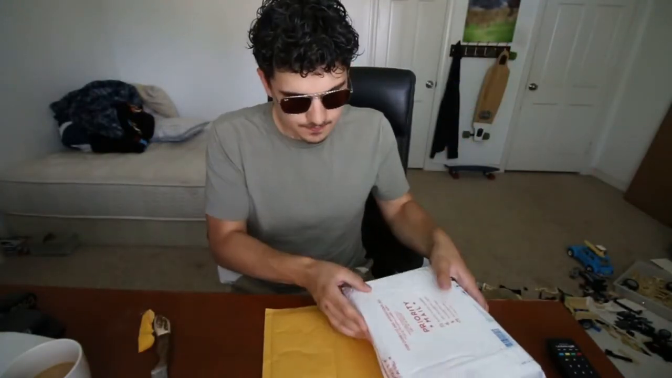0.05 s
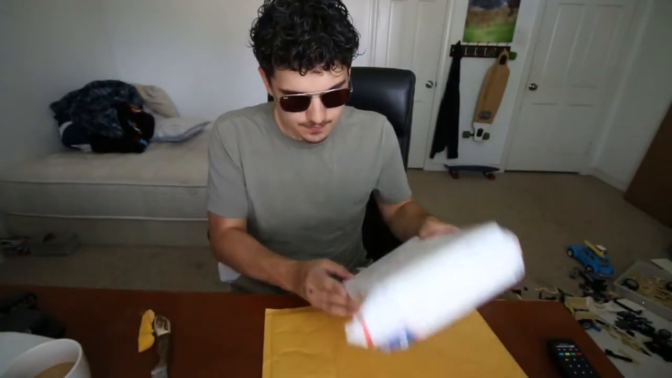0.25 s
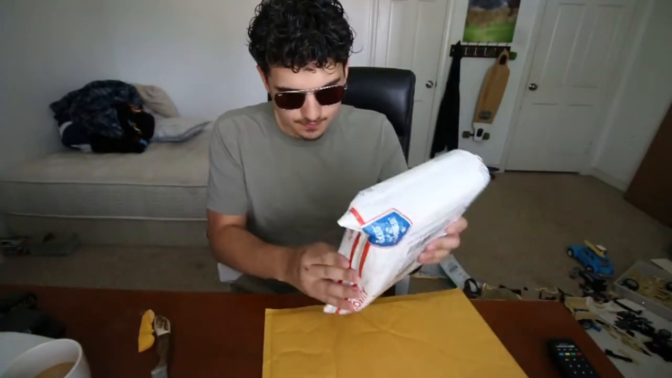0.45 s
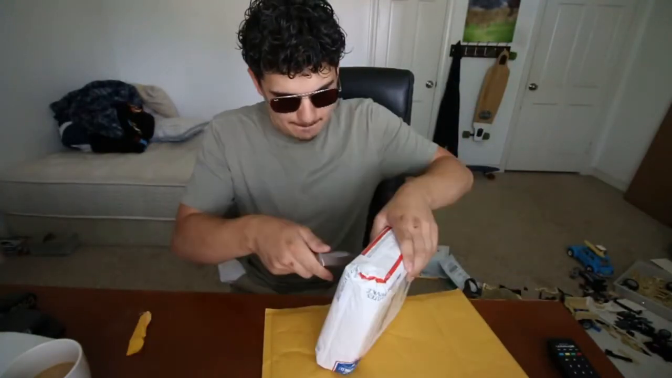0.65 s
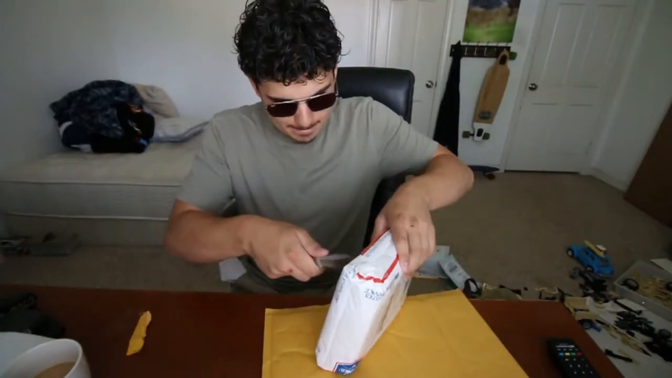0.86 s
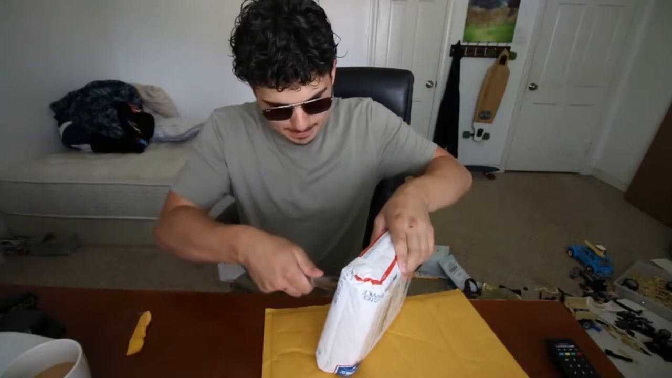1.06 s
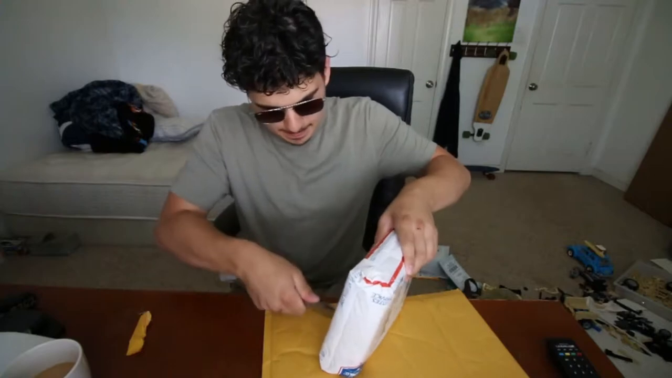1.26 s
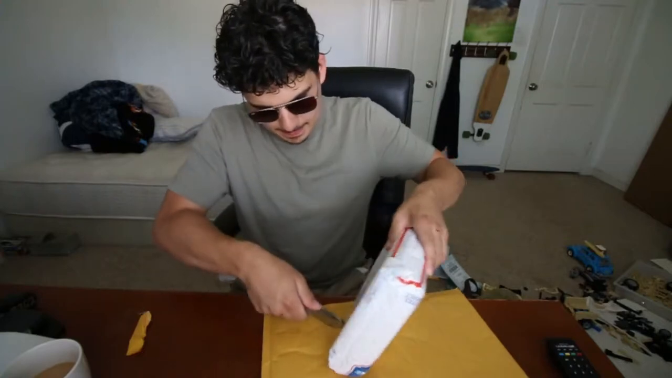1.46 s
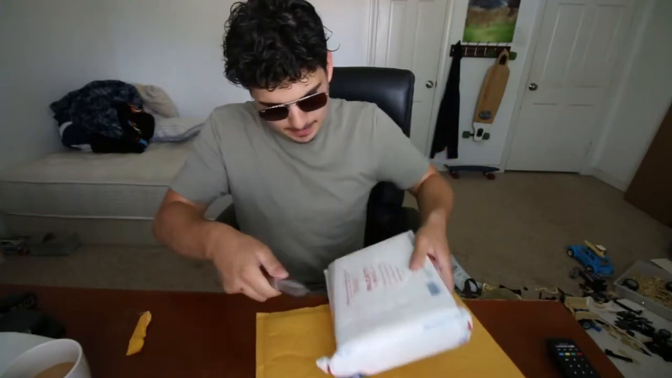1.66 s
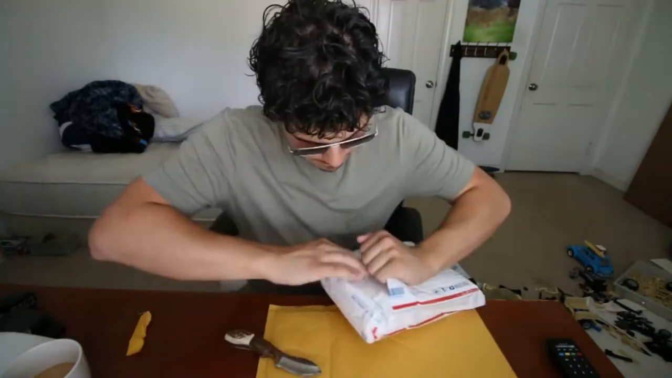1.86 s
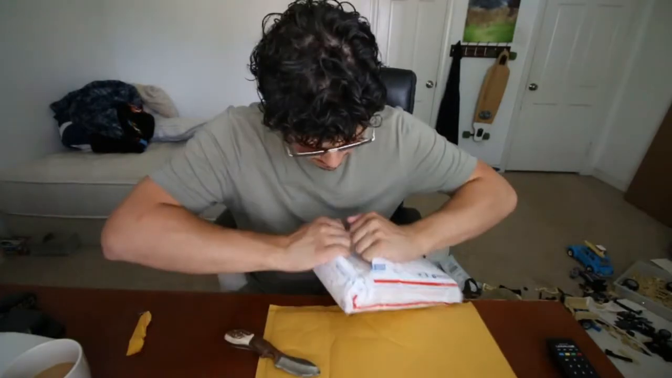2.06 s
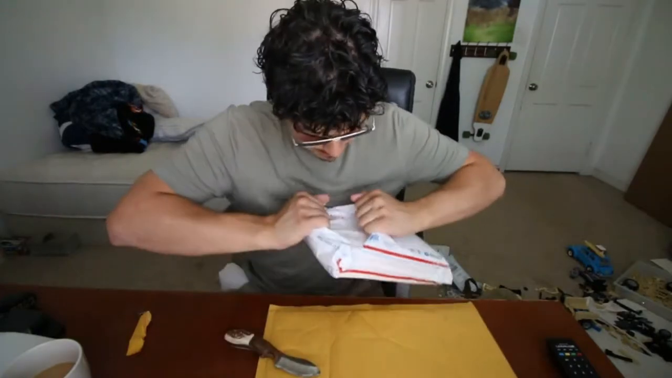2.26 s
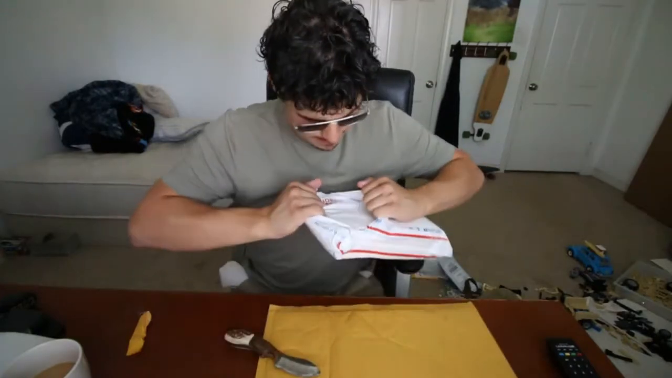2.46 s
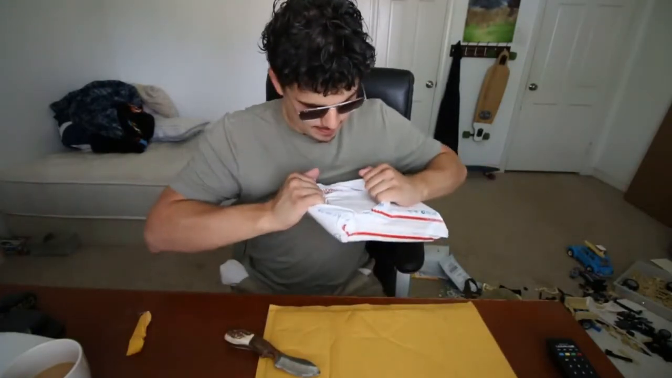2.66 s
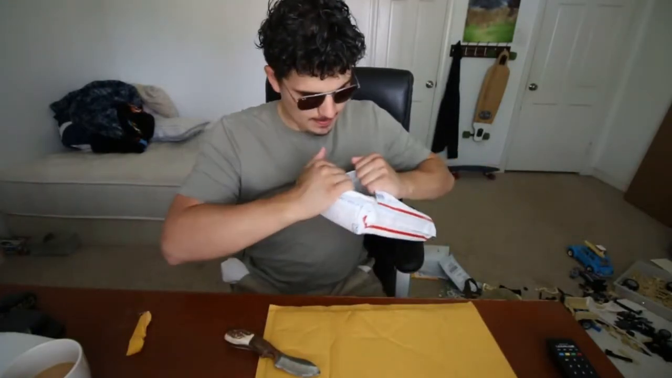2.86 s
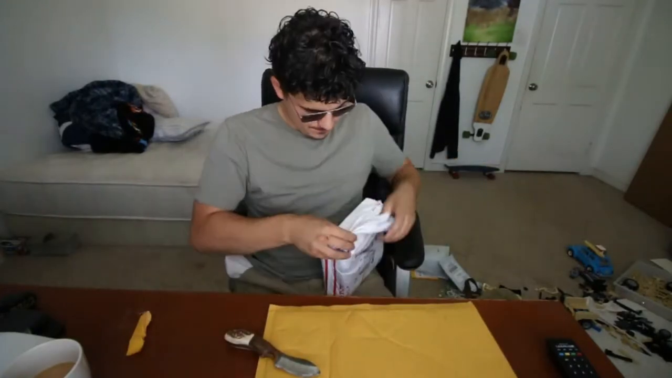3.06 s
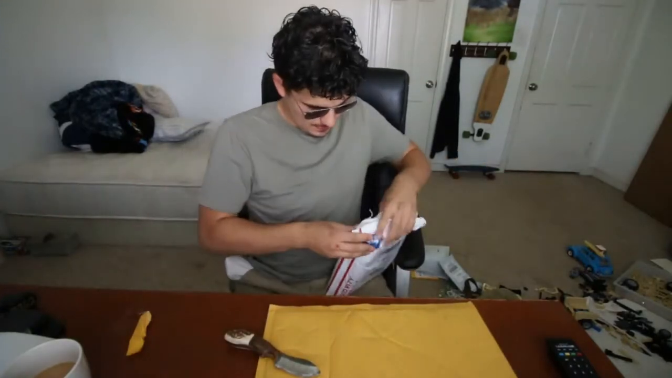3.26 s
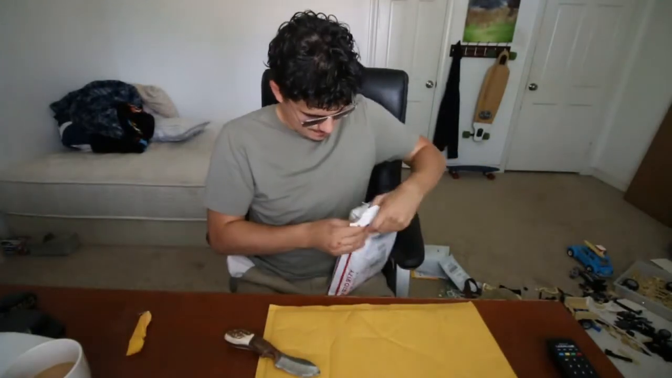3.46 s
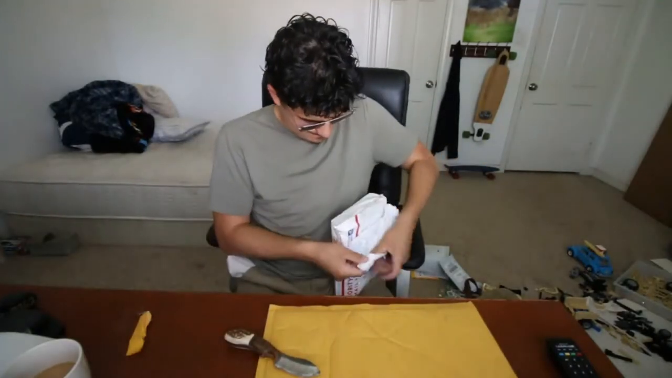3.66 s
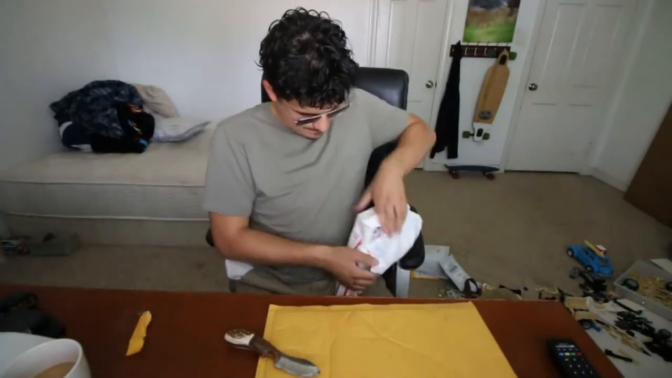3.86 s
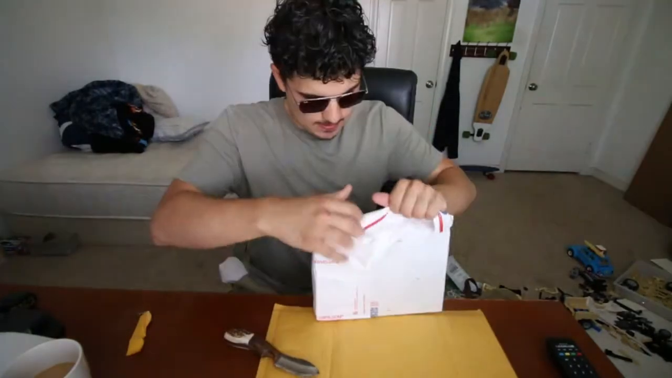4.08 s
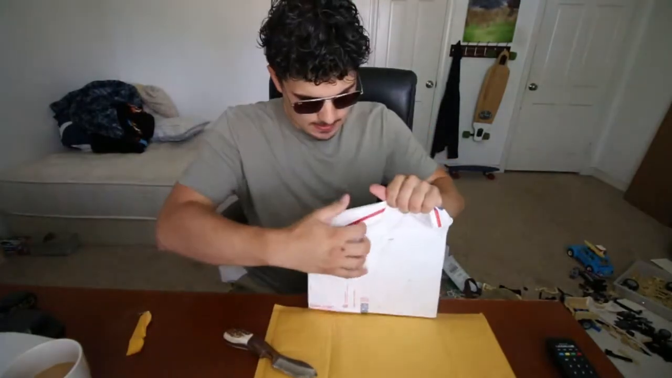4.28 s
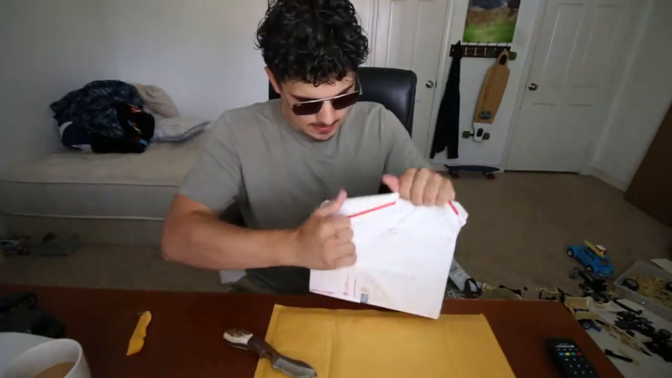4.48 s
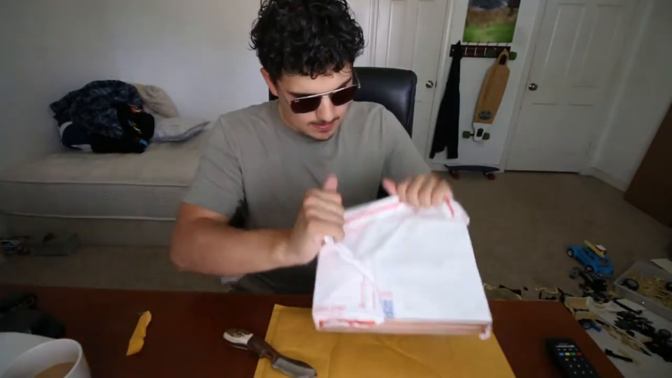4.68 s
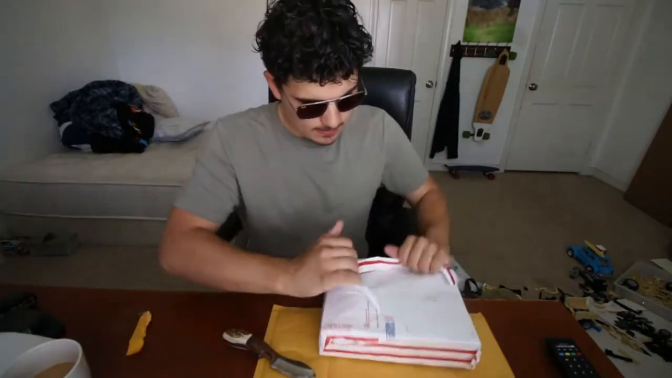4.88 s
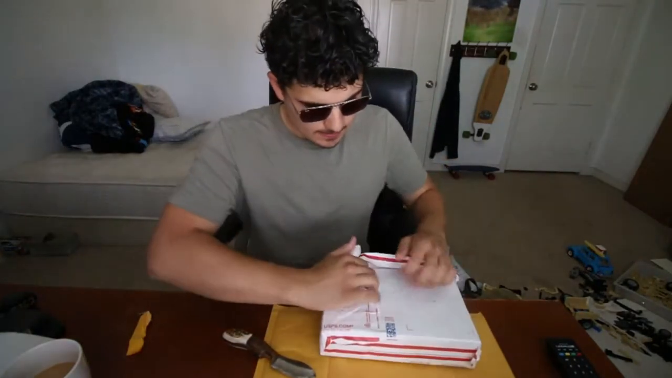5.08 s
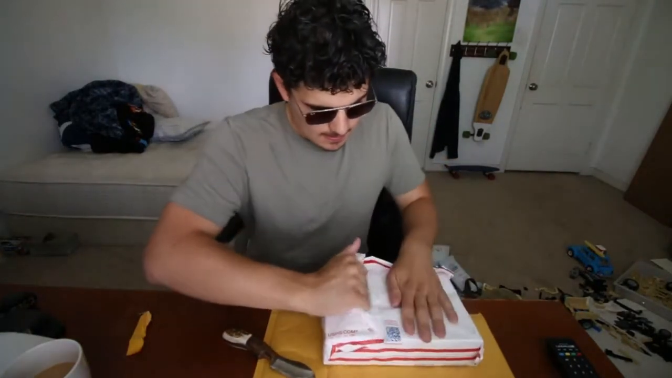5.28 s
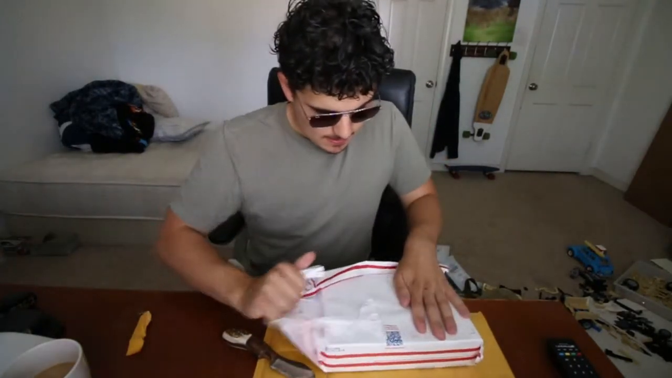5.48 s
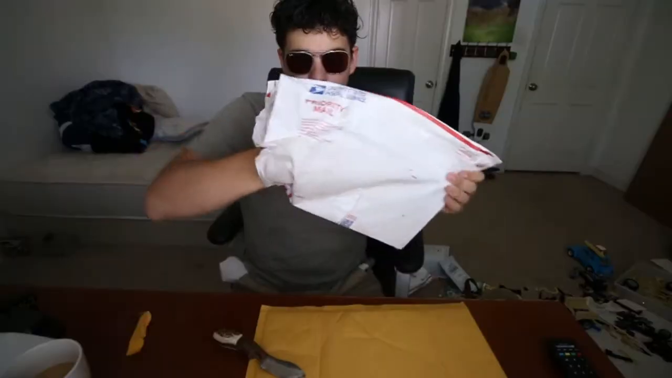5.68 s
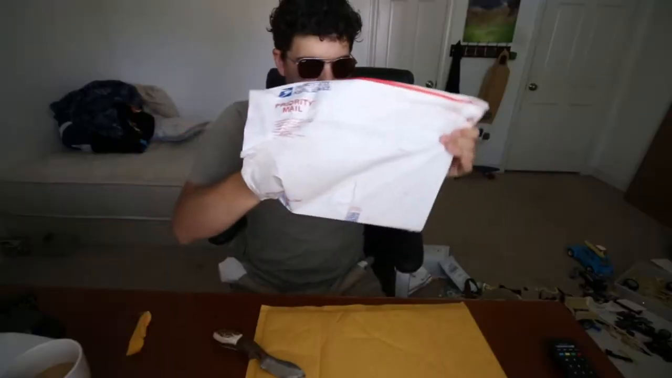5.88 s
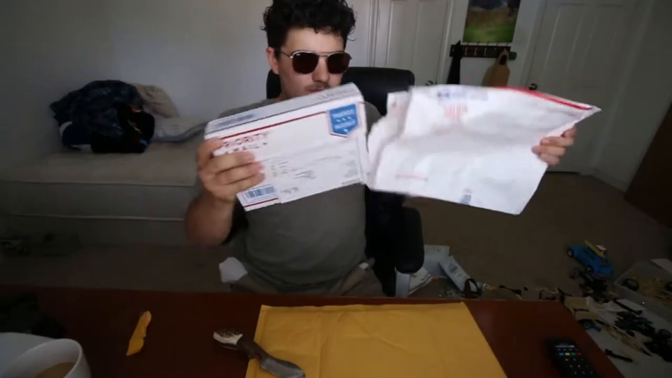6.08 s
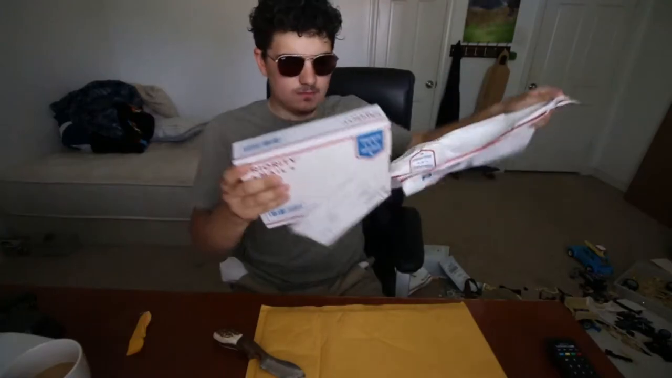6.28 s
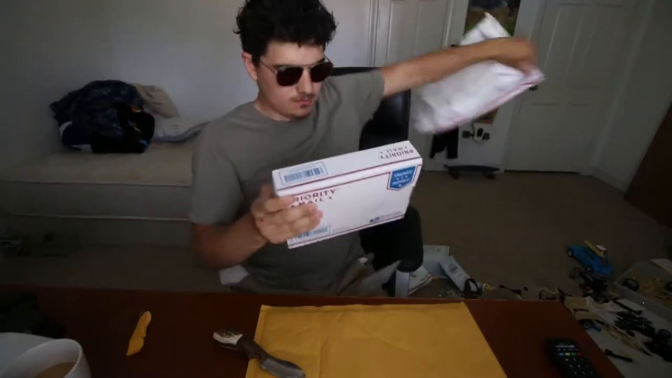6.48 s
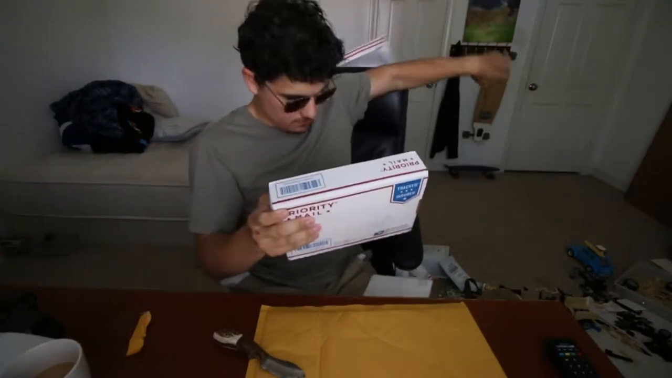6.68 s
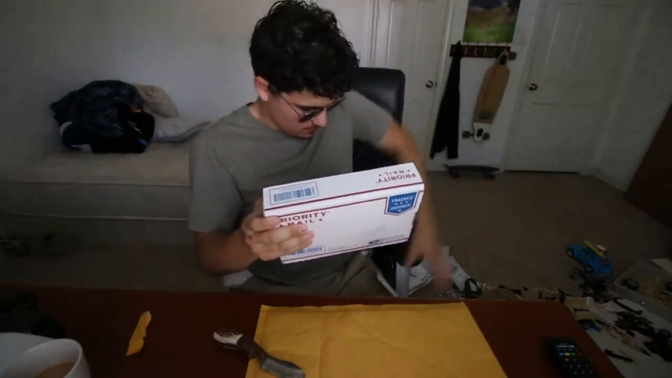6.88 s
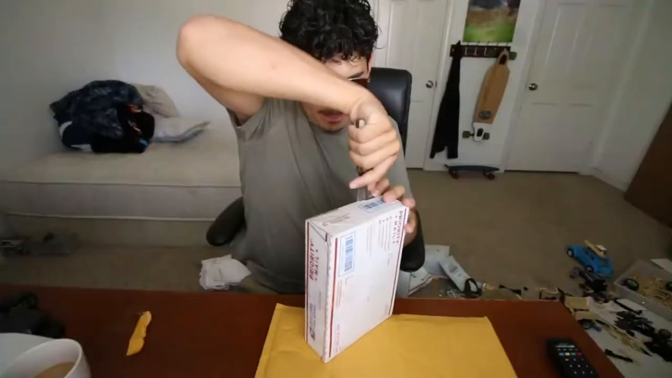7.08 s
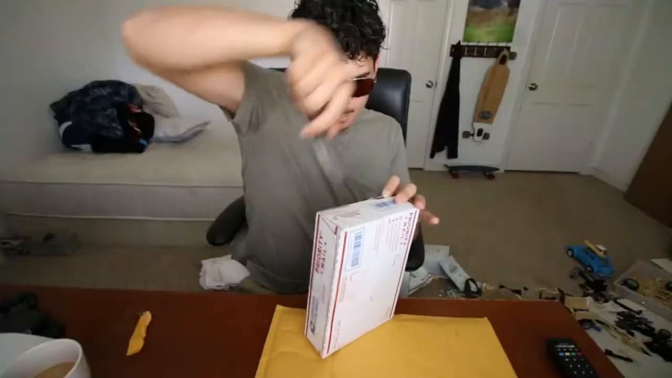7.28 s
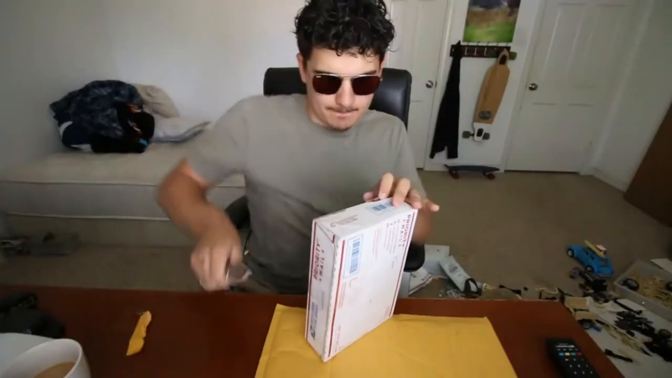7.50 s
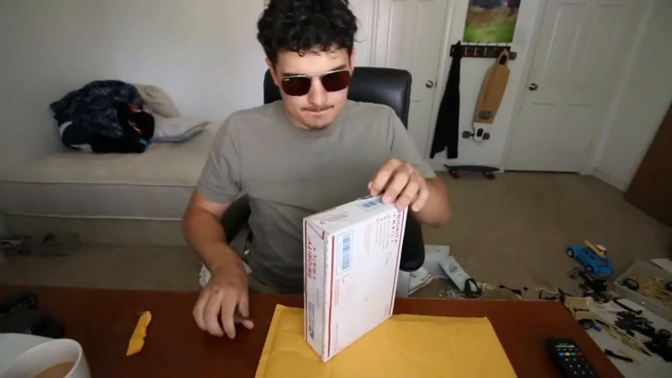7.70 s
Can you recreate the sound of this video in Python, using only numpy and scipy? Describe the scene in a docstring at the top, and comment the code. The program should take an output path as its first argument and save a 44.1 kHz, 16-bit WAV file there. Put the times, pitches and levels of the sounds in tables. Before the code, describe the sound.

Close, dry indoor handling noise: brief envelope crackles, quiet rubbing with a blade, a sharp snap and hollow knock, more fidgety crinkling, then strong tearing and crumpling of stiff wrapping. The bare box comes out with a last big crackle; it gets quiet, with soft scrapes and short dull taps on cardboard, and finally a hard knife drop on wood. Low desk bumps and faint room hiss lie beneath.

```python
"""A stiff mailing envelope around a cardboard box is turned, pulled and torn open at a wooden desk.
Its creases crinkle as clumps of tiny ringing clicks, and larger folds snap as short bursts of noise.
Pressing and rubbing filter that crinkle; bumps of the box are dying tones, the knife's drop ringing noise.
One microphone on a stand in a small soft room hears mostly direct sound, a faint echo, rumble and hiss."""
import sys
import numpy as np
from scipy import signal
from scipy.io import wavfile

SR = 44100
rng = np.random.default_rng(int(sys.argv[2]) if len(sys.argv) > 2 else 0)


def generate_wav(sig):
    """Save sig (samples, or channels by samples) to the path in sys.argv[1] as 16-bit PCM at SR."""
    pcm = np.round(np.clip(np.atleast_2d(sig).T, -1, 1) * 32767).astype(np.int16)
    wavfile.write(sys.argv[1], SR, pcm)


N = 341289  # samples

# In MOVES, PRESSES and RUBS, t is the moment of full strength; rise and fall are times to cross SWING_DB.
# pushes, pulls and tears of the hands: [t/s, rise/ms, hold/ms, fall/ms, crinkle level/dB,
# tearing level/dB re crinkle, weight on the box/dB re crinkle]
MOVES = [(0.0, 5, 1, 87, -39, -9, -4.5), (.06, 33, 150, 55, -49, -11, -7),
         (.32, 270, 1.6, 89, -45.5, -10, -8.5), (.39, 94, 7.1, 47, -40, -7, -6.5),
         (.42, 40, 106, 12, -48, -9, 0), (0.663, 7.1, 0.92, 19, -40, -11, -11),
         (0.781, 150, 0.91, 23, -46, -6, -8), (.93, 300, 1, 17, -56, -7, -9),
         (0.979, 28, 5, 126, -44.5, -8, 3), (1.132, 7.2, 61, 50, -51, -9, 7.5),
         (1.186, 63, 1, 440, -47, -11, 2.5), (1.412, 39, 1, 26, -40.5, -11, 1.5),
         (1.512, 120, 54, 94, -48.5, -9.5, -4.5), (1.699, 25, 90, 37, -44, -7, 0.5),
         (1.776, 100, 6.9, 170, -47, -9, -5), (1.799, 28, 1, 41, -50.5, -11, 11),
         (1.964, 80, 1, 600, -42.5, -6.5, -3), (2.148, 24, 67, 23, -35.5, -10.5, 0.5),
         (2.29, 120, 1, 420, -40, -10, -2), (2.472, 47, 1.1, 83, -41.5, -2, -23),
         (2.824, 46, 0.93, 240, -37.5, -8.5, -6), (3.078, 90, 1, 180, -48.5, -11, -7),
         (3.2, 350, 85, 120, -45.5, -7, -3.5), (3.444, 76, 62, 360, -38.5, -9, -6),
         (3.6, 32, 37, 810, -51, -3, -2), (3.87, 33, 2.4, 195, -41.5, -6.5, -1.5),
         (4.072, 48, 22, 30, -39.5, -15, -3), (4.096, 12, 0.89, 22, -31, -19, -1),
         (4.114, 22, 250, 61, -45.5, -11, -2), (4.418, 38, 1, 69, -27.5, -5, -4),
         (4.535, 26, 39, 50, -40.5, 0.5, -18), (4.631, 107, 0.71, 31, -22.5, -8, -7.5),
         (4.708, 65, 1, 23, -42, -9, 3.5), (4.76, 26, 19, 17, -47, -15, 0),
         (4.819, 19, 1, 96, -31.5, -11, 2), (4.999, 170, 15, 42, -42.5, -10.5, -1),
         (5.055, 40, 106, 30, -50.5, -9, 1), (5.175, 25, 26, 180, -27.5, -5.5, -7.5),
         (5.263, 5.5, 64, 90, -28.5, -0.5, -9.5), (5.35, 90, 51, 22, -24, -7, -7),
         (5.41, 22, 42, 30, -29.5, -6.5, -6), (5.466, 15, 40, 6.5, -27, -3, -4.5),
         (5.51, 22, 35, 15, -30.5, -11.5, -2), (5.655, 103, 1, 130, -36.5, -16.5, -2.5),
         (5.756, 5.5, 1, 10, -30.5, -25, -5), (5.89, 260, 1, 31, -42, -19, 0.5),
         (5.941, 45, 81, 51, -23, -11, -4), (6.118, 290, 1, 163, -37.5, -19.5, -2.5),
         (6.315, 32, 45, 36, -47, -19, -2), (6.516, 143, 24, 115, -41, -16.5, 0),
         (6.818, 53, 1, 81, -45, -26, -1), (6.915, 13, 1, 83, -52.5, -8.5, 4),
         (7.024, 44, 1, 51, -50.5, -11, 3.5), (7.147, 45, 25, 38, -39.5, -6.5, -1.5),
         (7.027, 3, 1, 7.1, -54, 1, -9), (7.246, 25, 1, 28, -59.5, -25, 12), (7.305, 58, 1, 24, -54, -8, 2),
         (7.36, 19, 1, 120, -51.5, -7.5, -2)]
SWING_DB = 20
BOOM_DB, BOOM_PER_WEIGHT = -6.5, 1.56  # the box booms out of proportion to the weight on it

# single folds that snap: [t/s, crinkle peak level/dB, tearing level/dB re peak,
# weight on the box/dB re peak, decay time constant/ms]
SNAPS = [(0.071, -33, -25, -19, 1.1), (0.112, -33.5, -2, 4, 0.75), (0.1927, -36, -11, -2, 2.1),
         (0.2257, -29.5, -9, -9, 3.8), (0.2426, -25.5, -9, -14, 1.8), (.257, -30, -6, -11, 2.1),
         (0.3247, -42, -16, -11, 1.5), (0.3425, -26.5, -14, -10, 2.5), (0.4695, -24.5, -18, -13, 1.1),
         (0.5156, -28, -7, -9, 0.92), (0.5356, -28, -7, -5.5, 3), (0.6614, -32.5, -10, -12, 1.1),
         (.873, -52, 10.5, -17, 1.1), (0.939, -38.5, -12, -5, 4.6), (1.135, -47, -21, -4, 1.5),
         (1.328, -44, 5, -9, 0.88), (1.5653, -30, -13, -1.5, 3.7), (1.7657, -27.5, -28.5, 5.5, 3.9),
         (1.9684, -36.5, 5, 10, 1.7), (2.0608, -29, -19, -6, 1.9), (2.1086, -20, -12, -18, 1.6),
         (2.136, -10.5, -14.5, 0.5, 2.9), (2.196, -30, -2, -17, 1.3), (2.2572, -15.5, -16, -1, 1.5),
         (2.363, -24.5, -8, -13, 1.3), (2.4735, -34.5, 5, 6, 3.2), (2.5613, -30, -5, -28, 1.1),
         (2.585, -29, -16, -2, 1.4), (2.647, -33.5, -11, -25, 1.5), (2.8218, -28, -6, -14, 0.31),
         (2.9336, -33.5, -23, -2.5, 2.7), (3.078, -30.5, -19, -9, 1.7), (3.203, -40, -3, -12, 1.1),
         (3.432, -29, -9, -15, 1.8), (3.4407, -18.5, -7, -32, 0.99), (3.5672, -34, -24, 12, 5.2),
         (3.8746, -30.5, -6, 1, 2.6), (4.034, -32, 0, -6, 1.4), (4.0726, -21.5, -21, -17, 1.2),
         (4.0969, -18.5, -6.5, -2, 2.8), (4.1602, -21.5, -22, -5.5, 2.6), (4.176, -27, -15, -7, 2),
         (4.2177, -20, -15, -3.5, 2.3), (4.2489, -29.5, -27, -0.5, 3.7), (4.275, -27.5, -30, -2, 3.4),
         (4.3239, -18, -8, -19, 1.2), (4.379, -26, -13, 2, 1.8), (4.393, -18.5, -31, -10, 4.2),
         (4.4157, -15, -3.5, -6.5, 3.9), (4.4787, -22.5, -10, -9, 1.7), (4.5176, -11, -5, -6, 8.6),
         (4.593, -20, 2, -12, 1.5), (4.6998, -26, -22, 4.5, 2.4), (4.7386, -15.5, -5, -13.5, 2.2),
         (4.8103, -24, -12, -1.5, 2.2), (4.904, -24.5, -16, -13, 2.8), (4.9627, -27, -8, -7, 1.9),
         (4.993, -25, -9, -1.5, 4.1), (5.019, -23, -12, -19, 1), (5.153, -25, 2, -11, 0.68),
         (5.1732, -19, -4, -6.5, 1.2), (5.262, -24, -18, -18, 1.3), (5.289, -19.5, -6, -9, 1.7),
         (5.333, -36, 0, -16, 1), (5.373, -30.5, 9, -17, 1.1), (5.39, -21, -16, -14, 1.3),
         (5.443, -23, 6, -18, 1.6), (5.468, -26, -6, -6, 0.99), (5.5159, -15.5, -5, -5, 0.64),
         (5.626, -24.5, -11, -6, 1.7), (5.657, -24, -5.5, -3, 2.9), (5.7011, -25.5, -18, -4, 2.4),
         (5.7527, -16, -18, -14, 1.5), (5.8157, -26, -22, -3, 6.3), (5.851, -29.5, -13, -3, 3.5),
         (5.8773, -23.5, -21, -9, 3.7), (5.9077, -33, 1, -2, 3.6), (5.9355, -16, -9, -2.5, 3.6),
         (5.9828, -10, -24, -12, 3.4), (6.087, -23, -32, -23, 5.4), (6.2354, -29, -14, -8, 5),
         (6.311, -45, -43, -4, 1.9), (6.473, -31.5, -10, -3.5, 4), (6.5241, -25, -26, -21, 1.1),
         (6.9119, -48, -4, -7, 1.2)]
SNAP_BOOM_DB, SNAP_BOOM_PER_WEIGHT = -11, 1.05  # a snap is too quick to move much of the box

# sheet and microphone together: [f/Hz, level/dB]
PAPER = [(35, -42), (60, -9.5), (222, 3), (420, -4), (820, -4), (1200, 0), (1800, -3), (2600, 2),
         (3300, 2.5), (3700, 4), (4100, -2.5), (4800, -5), (12400, -11.5), (16000, -19)]

# a finger or the blade rubs over a hollow part of the parcel:
# [t/s, rise/ms, hold/ms, fall/ms, level/dB, pitch f/Hz]
RUBS = [(.425, 13, 7.7, 29, -40, 766), (.99, 22, 26, 55, -51, 1250), (1.16, 23, 30, 80, -48.5, 1240),
        (1.2, 48, 30, 96, -44, 506), (1.77, 20, 5.5, 23, -33, 1910), (1.974, 35, 12, 48, -36, 643),
        (3.15, 50, 33, 80, -50, 1650), (4.225, 8.4, 6.2, 20, -33.5, 910), (4.25, 8, 5.2, 17, -46, 590),
        (4.285, 13, 8.2, 21, -36, 1180), (4.41, 17, 12, 22, -43, 1050), (7.15, 63, 22, 64, -43.5, 860),
        (7.295, 8, 22, 12, -50, 770), (7.4, 22, 18, 40, -46, 564)]
RUB_SHARPNESS = 8.5  # pitch over width

# the box is pressed or shifted on the desk and only booms: [t/s, rise/ms, hold/ms, fall/ms, level/dB]
PRESSES = [(0.0, 5, 45, 190, -49.5), (.11, 30, 35, 200, -57.5), (.394, 23, 21, 270, -58.5),
           (.94, 8.6, 4.1, 29, -52), (1.05, 38, 9.1, 36, -52), (1.186, 44, 7.8, 340, -43),
           (1.39, 34, 31, 41, -62), (1.8, 44, 17, 43, -49), (1.964, 26, 8.1, 91, -39),
           (2.3, 30, 30, 100, -53), (2.93, 150, 48, 60, -53.5), (3.28, 170, 16, 41, -50.5),
           (3.49, 89, 120, 91, -46), (4.09, 30, 4.9, 45, -42), (4.707, 28, 4.2, 20, -56),
           (4.782, 14, 4.2, 13, -63), (5.055, 50, 15, 49, -42), (5.95, 100, 44, 54, -37.5),
           (7.25, 17, 4.1, 110, -51.5), (7.36, 43, 24, 110, -45), (7.47, 17, 12, 63, -47.5)]

# dull bumps of the box: [t/s, peak level of the tone/dB, pitch f/Hz]
BUMPS = [(0.398, -29.5, 295), (0.426, -28, 730), (1.809, -25.5, 265), (1.965, -29, 300),
         (2.259, -15.5, 610), (2.274, -16.5, 626), (3.572, -30.5, 312), (3.761, -30.5, 336),
         (3.873, -29, 141), (4.813, -27.5, 138), (6.536, -35, 217), (6.913, -32.5, 900), (7.019, -57, 410),
         (7.242, -32, 816), (7.339, -13.5, 525), (7.457, -28, 646), (7.599, -42, 170)]
BUMP_CYCLES = 8.8  # a bump dies by 60 dB in this many cycles

DROP_S, DROP_DB = 7.5948, -26.5  # the knife lands on the desk: time, ring level without its opening knock
# dense modes of the desk top: [f/Hz, relative level/dB]
DESK = [(35, -46), (60, -4), (346, -7.5), (469, -5.5), (924, -2.5), (1060, -4), (1340, -4), (2140, -18),
        (3500, -18), (3760, -22.5), (16000, -45)]
# how long the desk top rings: [f/Hz, time to fall 60 dB/s]
DESK_RING = [(100, 0.32), (700, 0.59), (1400, 0.46), (3000, 0.15), (8000, 0.0087)]

# low resonances of desk and box: [f/Hz, width/Hz, level/dB re the driving sound]
HOLLOW = [(122.3, 5.1, -7.5), (238, 5.1, 3), (348, 49, -1)]

# decay of the small room: [f/Hz, time to fall 60 dB/s]
ROOM = [(100, 0.49), (1000, 0.26), (2500, 0.38), (5500, 0.42), (10000, 0.29)]
PAPER_ROOM_DB, BLOW_ROOM_DB = -14, -12  # sent to the room

# jolts of the desk that shake the microphone stand: [t/s at full strength, level/dB]
JOLTS = [(0.0, -67), (1.01, -61), (1.77, -50), (2.2, -71), (2.87, -69), (3.49, -70), (3.88, -73),
         (4.2, -67), (4.85, -50), (5.24, -55), (5.99, -53), (6.94, -62), (7.15, -66), (7.39, -58),
         (7.61, -58)]
JOLT_RISE_MS, JOLT_HOLD_MS, JOLT_FALL_MS, STAND_REST_DB = 60, 10, 130, -81

# room tone at the microphone: [f/Hz, relative level/dB]
AIR = [(18, -62), (30, -40), (93, 9), (227, 10.5), (426, -8), (600, 5), (2680, -8), (3580, -5),
       (5740, -8.5), (13700, -13.5), (16000, -12)]
AIR_DB = -65  # rms

# faint difference between the two channels: [f/Hz, level/dB re the common sound]
UNLIKE = [(30, -17), (120, -35), (500, -42), (2500, -53), (5000, -35), (15000, -25)]
EDGE_HZ = 15900  # upper band limit


def creases(per_s=4200, spread_db=3.0, clump_db=2.0, shift_db=3.5, slide_db=-3.5, cycles=1.19, count=16):
    """Clicks of uneven size come in clumps; each rings a small facet, and the busy facets keep changing."""
    clumps = gain_of(clump_db * wander(68.4))
    size = gain_of(spread_db * np.minimum(rng.exponential(1, N), 5)) * rng.choice([-1, 1], N)
    happens = rng.random(N) < per_s / SR
    clicks = size * clumps * happens
    facet = rng.integers(0, count, N)
    busy = gain_of(shift_db * wander(20))
    starts = rng.integers(0, N, count)  # each facet reads the same wander from its own place
    t = np.arange(600) / SR
    ringing = np.zeros(N)
    for k, hz in enumerate(np.geomspace(500, 12000, count)):
        # the ring falls to 1/e in the given cycles
        ring = np.cos(2 * np.pi * hz * t) * np.exp(-t * hz / cycles) * np.sqrt(hz / 20000)
        ring[0] += .4  # sharp edge of the click
        on_facet = clicks * (facet == k) * np.roll(busy, starts[k])
        ringing += signal.oaconvolve(on_facet, ring)[:N]
    slide = gain_of(slide_db) * clumps * rng.standard_normal(N)  # sheet sliding on sheet
    return colour(evened(ringing) + slide, PAPER)


def rustle(sheet):
    """The steady crinkle under the hands: tearing lifts the treble, weight on the box the lower bands."""
    crinkle_db, tear_db, weight_db = np.transpose(MOVES)[4:]
    boom_db = crinkle_db + BOOM_DB + BOOM_PER_WEIGHT * weight_db
    gains = swells(MOVES, [crinkle_db, crinkle_db + tear_db, crinkle_db + weight_db, boom_db])
    return sum(gain * evened(part) for gain, part in zip(gains, split(sheet)))


def snaps():
    """Each fold lets go at once: a sharp edge and a short dying rattle."""
    out = np.zeros(N)
    t = np.arange(1500) / SR
    for s, peak_db, tear_db, weight_db, ms in SNAPS:
        noise = rng.standard_normal(len(t))
        attack = np.minimum(t / 0.00018, 1)
        rattle = noise * np.exp(-1000 * t / max(ms, .3)) * attack
        boom_db = SNAP_BOOM_DB + SNAP_BOOM_PER_WEIGHT * weight_db
        parts = zip(split(colour(rattle, PAPER)), (0, tear_db, weight_db, boom_db))
        add(out, s, sum(gain_of(peak_db + db) * part / abs(part).max() for part, db in parts))
    return out


def rubs(sheet):
    """A finger or blade rubbing the parcel: crinkle heard through one hollow resonance."""
    out = np.zeros(N)
    for row in RUBS:
        level_db, hz = row[4:6]
        ringing = signal.lfilter(*signal.iirpeak(hz, RUB_SHARPNESS, SR), sheet)
        out += swells([row], [[level_db]])[0] * evened(ringing)
    return out


def presses(sheet):
    """The box pressed or shifted on the desk: only the low part of the crinkle comes through."""
    deep = band(sheet, 2, [110, 420])
    return swells(PRESSES, np.transpose(PRESSES)[4:])[0] * evened(deep)


def bumps():
    """Each bump rings the box at one pitch, briefly, under a small crack of noise."""
    out = np.zeros(N)
    t = np.arange(SR // 4) / SR
    for s, peak_db, hz in BUMPS:
        tone = gain_of(peak_db - 60 * t * hz / BUMP_CYCLES) * np.sin(2 * np.pi * hz * t)
        crack = band(rng.standard_normal(len(t)) * np.exp(-t / 0.0045), 2, [300, 2500])
        add(out, s, tone + gain_of(peak_db - 10) * crack / abs(crack).max())
    return out


def knife_drop():
    """The knife sets the dense modes of the whole desk top ringing after a hard knock."""
    out = np.zeros(N)
    t = np.arange(SR // 4) / SR
    modes = evened(colour(rng.standard_normal(len(t)), DESK))
    ring = dying(modes, DESK_RING)[:len(t)]
    knock = 1 + 5.7 * np.exp(-t / 0.0071)
    attack = np.minimum(t / 0.00083, 1)
    add(out, DROP_S, gain_of(DROP_DB) * ring * knock * attack)
    return out


def hollow(x):
    """Low resonances of desk and box, driven by the sound given."""
    return sum(gain_of(db) * signal.lfilter(*signal.iirpeak(hz, hz / width, SR), x)
               for hz, width, db in HOLLOW)


def room(x):
    """Sparse echoes of random sign, each band dying at its own speed."""
    taps = np.zeros(SR // 2)
    at = np.arange(200, len(taps) - 20, 20)
    taps[at + rng.integers(0, 20, len(at))] = rng.choice([-1., 1.], len(at))
    tail = dying(taps, ROOM)
    return signal.fftconvolve(x, tail / np.linalg.norm(tail))[:N]


def shake():
    """Lumpy rumble through the desk into the microphone stand: low noise swelling at each jolt."""
    low = band(rng.standard_normal(N), 3, [32, 72])
    rows = [(s, JOLT_RISE_MS, JOLT_HOLD_MS, JOLT_FALL_MS) for s, db in JOLTS]
    jolts = swells(rows, [np.transpose(JOLTS)[1]])[0]
    return (jolts + gain_of(STAND_REST_DB)) * evened(low)


def room_tone():
    """Faint hiss of room and microphone: steady coloured noise."""
    return gain_of(AIR_DB) * evened(colour(rng.standard_normal(N), AIR))


def gain_of(db):
    """Decibels to gain."""
    return 10 ** (np.asarray(db) / 20)


def evened(x):
    """Scales to rms 1."""
    return x / np.sqrt(np.mean(x ** 2) + 1e-20)


def read(points, hz):
    """Reads a table by frequency on a logarithmic axis."""
    f, value = np.transpose(points)
    return np.interp(np.log(hz + 1), np.log(f + 1), value)


def add(mix, s, sound):
    """Mixes a sound in at second s."""
    part = mix[round(s * SR):][:len(sound)]
    part += sound[:len(part)]


def colour(x, points):
    """Causal filter of a given spectrum: the phase follows from the log gain."""
    half = np.log(gain_of(read(points, np.fft.rfftfreq(4096, 1 / SR))))
    full = np.concatenate([half, half[-2:0:-1]])
    phase = -signal.hilbert(full).imag  # minimum phase
    taps = np.fft.ifft(np.exp(full + 1j * phase)).real[:2048]
    return signal.oaconvolve(x, taps)[:len(x)]


def band(x, order, hz, kind="bandpass"):
    """Butterworth filter."""
    return signal.sosfilt(signal.butter(order, hz, kind, fs=SR, output="sos"), x)


def split(x, edges_hz=(105, 700, 1800, 4600)):
    """Crinkle, fizz, scrape and boom: four bands of a sound."""
    a, b, c, d = edges_hz
    return band(x, 3, [c, d]), band(x, 3, d, "highpass"), band(x, 3, [b, c]), band(x, 3, [a, b])


def wander(hz):
    """Slow chance of rms 1: noise below the given rate."""
    return evened(signal.lfilter(*signal.butter(2, hz, fs=SR), rng.standard_normal(N)))


def dying(x, t60):
    """Lets each band of a sound die at its own speed."""
    hz, t, z = signal.stft(x, SR, nperseg=256, noverlap=192)
    fade = gain_of(-60 * t / read(t60, hz)[:, None])
    return signal.istft(z * fade, SR, nperseg=256, noverlap=192)[1]


def swells(rows, levels_db):
    """Unrelated swells (s, rise, hold, fall ms) add in power; one gain curve for each set of levels."""
    t = np.arange(0, N / SR + .002, .001)
    s, rise, hold, fall = np.transpose(rows)[:4, :, None]
    late_ms = 1000 * (t - s)
    before = np.maximum(-late_ms, 0) / rise
    after = np.maximum(late_ms - hold, 0) / fall
    shape = gain_of(-SWING_DB * (before + after))
    curves = [np.sqrt(gain_of(db) ** 2 @ shape ** 2) for db in levels_db]
    return [np.interp(np.arange(N) / SR, t, curve) for curve in curves]


def scene():
    """All sources at one microphone, the same in both channels."""
    sheet = creases()
    backward = sheet[::-1]  # keeps rubs and presses from following the rustle click for click
    paper = rustle(sheet) + snaps() + rubs(backward) + presses(backward)
    blows = bumps() + knife_drop()
    air = room_tone()
    dull_blows = signal.lfilter(*signal.butter(1, [150, 2300], "bandpass", fs=SR), blows)
    echo = room(gain_of(PAPER_ROOM_DB) * paper + gain_of(BLOW_ROOM_DB) * dull_blows)
    resonance = hollow(paper + blows + gain_of(6) * air)
    one = paper + blows + echo + air + resonance + shake()
    return np.array([one, one])


def record(dry):
    """A faint smeared part has opposite sign in the two channels; then the band limit."""
    smear = rng.standard_normal(4000) * np.hanning(4000)
    smeared = signal.oaconvolve(dry[0], smear / np.linalg.norm(smear), "same")
    apart = colour(smeared, UNLIKE)
    both = dry + apart * np.array([[1], [-1]])
    lowpass = signal.firwin(511, EDGE_HZ, window=("kaiser", 9), fs=SR)
    return signal.oaconvolve(both, lowpass[None], "same")


dry = scene()
out = record(dry)
generate_wav(out)
```